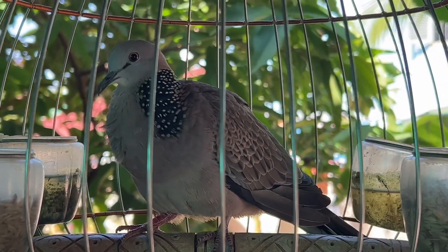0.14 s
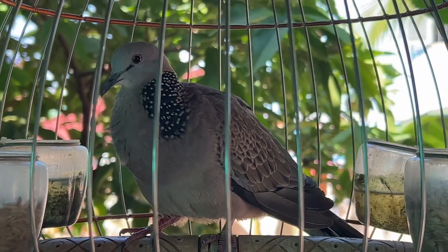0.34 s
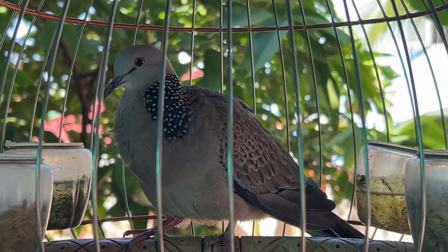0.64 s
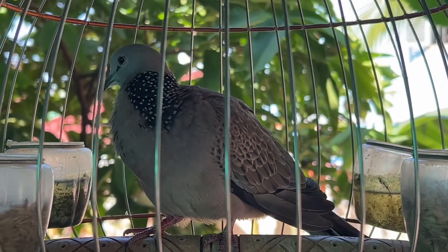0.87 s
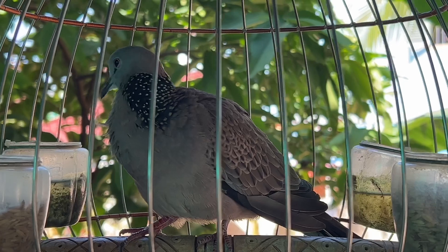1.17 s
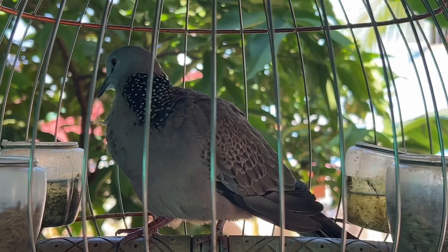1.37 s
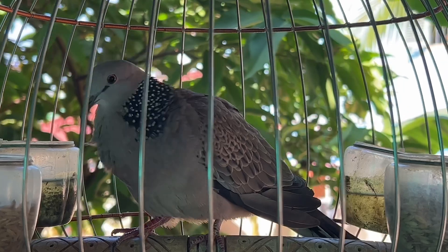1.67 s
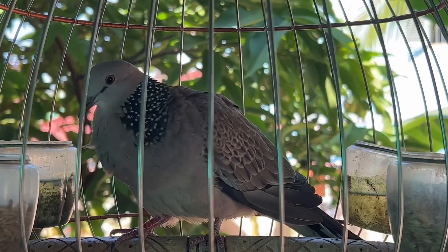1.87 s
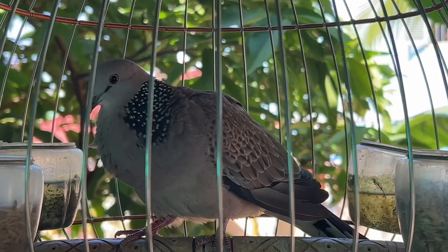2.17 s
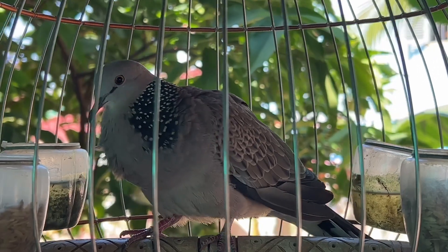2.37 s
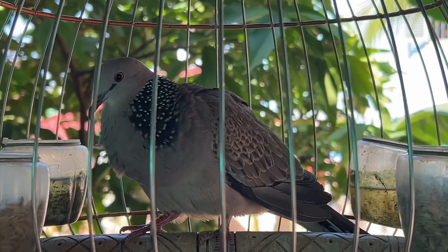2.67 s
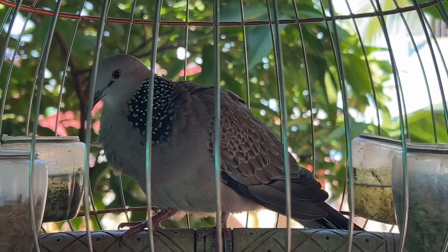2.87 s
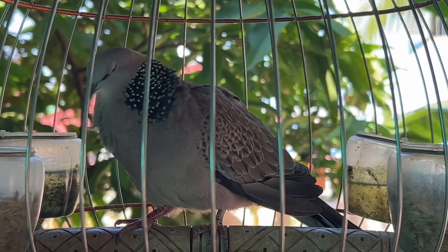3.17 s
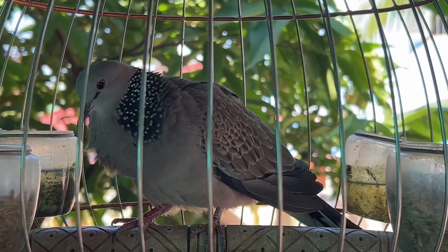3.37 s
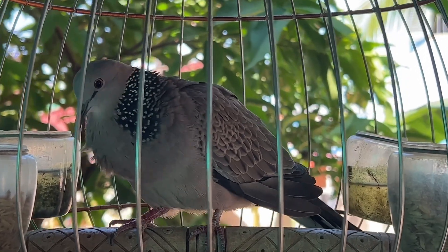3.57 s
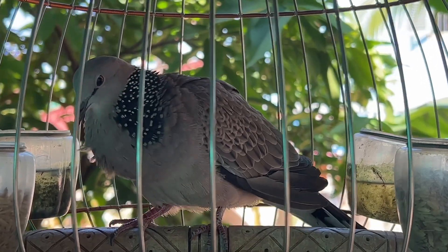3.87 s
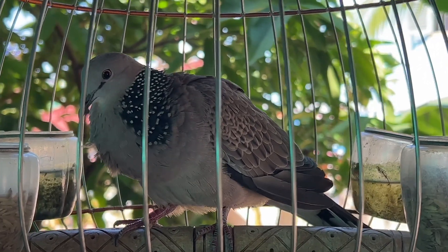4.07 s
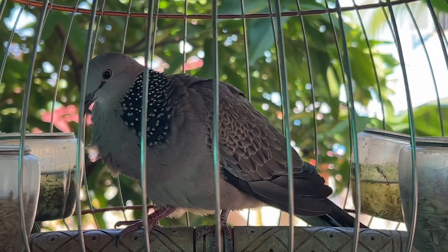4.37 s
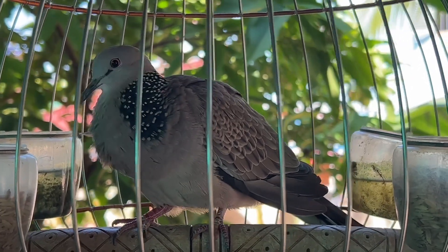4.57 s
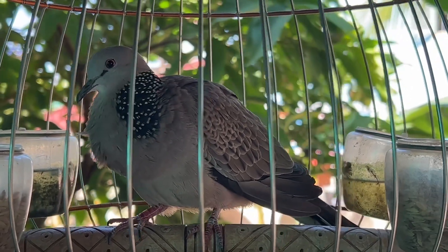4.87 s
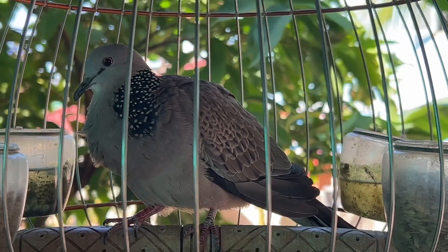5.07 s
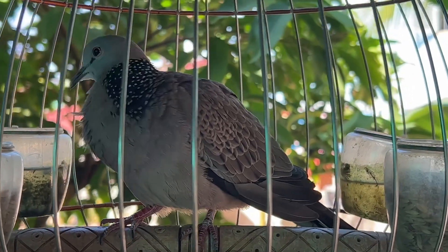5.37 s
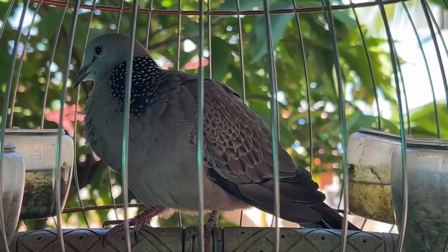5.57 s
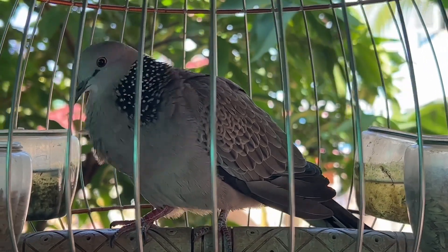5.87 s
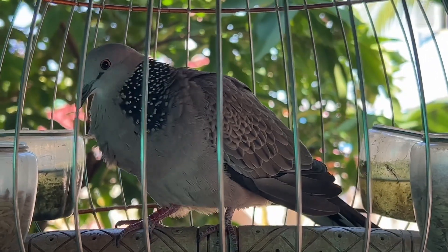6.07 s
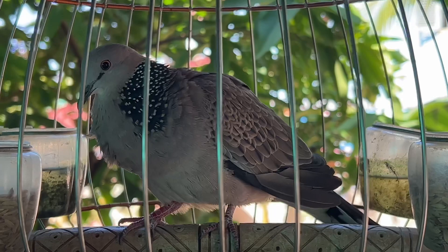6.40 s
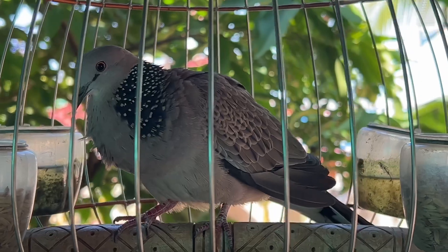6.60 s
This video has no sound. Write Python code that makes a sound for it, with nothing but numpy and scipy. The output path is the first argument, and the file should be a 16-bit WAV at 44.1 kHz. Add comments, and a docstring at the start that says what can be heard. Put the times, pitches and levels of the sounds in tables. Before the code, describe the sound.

A far, hoarse fowl calls over a low hum of traffic and softly hissing leaves. Then a dove coos close to the microphone, three times over: two short, rounded notes and a long, fluttering, falling one. Thin whistles from a small bird accompany the first phrase, and a distant motorbike fades away. Bright, ringing metal knocks and clinks start just before the last phrase and continue through it.

```python
"""A garden: a caged spotted dove, close by, gives three phrases of two soft arched coos and a long one
that trills and sinks. Its near-pure tone is shaped by the swollen crop and chopped by the throat.
Around it: traffic rumble, exhaust hum, leaf hiss, a far hoarse fowl and a small whistling bird.
Towards the end, a little way off, loose metal clatters and a steel tool clinks, both ringing in modes."""
import sys
import numpy as np
from scipy import signal
from scipy.fft import rfft, irfft
from scipy.io import wavfile
from scipy.ndimage import uniform_filter1d

SR = 44100
rng = np.random.default_rng(int(sys.argv[2]) if len(sys.argv) > 2 else 0)


def wav_record(signal):
    """Record a signal, one row per channel, as 16-bit PCM in the file named by sys.argv[1]."""
    frames = np.transpose(np.atleast_2d(signal))
    bounded = np.clip(frames, -1, 1)
    # unit amplitude maps onto the largest positive 16-bit level
    quanta = np.round(bounded * 32767).astype(np.int16)
    wavfile.write(sys.argv[1], SR, quanta)


N = 297234
TIME = np.arange(N) / SR

# open-air level curves (time [s], wash [dB], leaves [dB])
AIR_LEVELS = [(0.0, -54.5, -48), (0.43, -52, -47), (0.9, -55.5, -49.5), (1.34, -57, -54), (2.6, -55, -49),
              (2.91, -56.5, -50.5), (3.31, -61.5, -54.5), (4.56, -65.5, -60), (4.81, -63.5, -58.5),
              (5.3, -66, -59), (6.1, -60, -48.5)]
# traffic spectrum (frequency [Hz], density [dB])
RUMBLE_SPECTRUM = [(20, -44), (30, -34.5), (40, 1), (60, 1), (85, 2), (120, 0), (170, -5), (230, -13),
                   (330, -25), (700, -69.5)]
# neighbourhood wash spectrum (frequency [Hz], density [dB])
WASH_SPECTRUM = [(120, -26.5), (260, 1.5), (500, -1), (900, -3.5), (1400, -6.5), (2500, -14), (5000, -46.5)]
# leaf hiss spectrum (frequency [Hz], density [dB])
LEAF_SPECTRUM = [(900, -7), (2200, 5.5), (3500, 1.5), (6500, 1.5), (8800, -4), (10000, -10.5), (12000, -14),
                 (15500, -17.5)]
# steady motors (rotation [Hz], nearest at [s], time to -6 dB [s], harmonics 2, 3, 6 [dB])
MOTOR_PASSES = [(26.5, 0.6, 1.6, -40, -51, -46.5), (26.35, 6.88, 0.42, -60.5, -30.5, -38.5)]
# slowing motorbike (time [s], firing rate [Hz], level [dB])
BIKE_TRACK = [(.4, 26.5, -62), (1.4, 27, -41.5), (1.9, 25.5, -43), (2.5, 24.6, -44), (3.2, 24.6, -40),
              (3.5, 23.5, -44), (4.4, 23.5, -50)]
# its exhaust harmonics (multiple of firing rate, level [dB])
BIKE_HARMONICS = [(4, 0), (5, 0), (6, -7), (7, -9.5)]
# fowl, one curve a call (time [s], pitch [Hz], fundamental [dB], octave [dB], hoarseness [share of pitch])
FOWL_CALLS = [
    [(0.13, 495, -52, -60, 0.0088), (0.155, 515.5, -42, -48, .01), (0.2, 508, -64, -61, 0.0091),
     (0.305, 523.4, -62, -64, 0.017), (0.32, 535, -39, -36.5, .012), (0.37, 542, -35.5, -37, .02),
     (0.44, 552, -41.5, -48, 0.036), (0.5, 549.7, -41, -49, 0.049), (0.575, 569, -38.5, -38, 0.041),
     (0.67, 551.6, -40, -50.5, 0.035), (0.76, 506, -41.5, -45, 0.024), (0.82, 418, -51, -65, .03)],
    [(2.5, 547, -59, -54, .05), (2.63, 555, -60, -47, .05), (2.7, 586, -67, -52, .07),
     (2.78, 627, -58, -50, .07), (2.87, 602, -66, -59, 0.066), (2.95, 559, -67, -54, 0.058),
     (3.12, 537, -66, -55, .05)],
]
# arched coos, two a phrase (time [s], rise [s], fall [s], start [Hz], top [Hz], end before release [Hz],
# gain [dB], quiver delay [s], quiver depth [0-1])
ARCHED_COOS = [(1.548, 0.04, 0.061, 406, 509, 346, 1, 0.11, 0.7),
               (1.7, 0.11, 0.079, 348.5, 576.4, 516, -0.5, 0.059, 0.66),
               (3.195, 0.043, 0.071, 413, 530, 414, 1, 0.071, 0.33),
               (3.311, 0.13, 0.057, 428.4, 572, 520, -1, 0.085, 0.67),
               (5.745, 0.048, 0.06, 396, 526, 352, 2, 0.071, 0.14),
               (5.88, 0.13, 0.068, 364.3, 583, 516, 1.5, 0.062, 0.54)]
# long coos, one a phrase (time [s], length [s], top [Hz], gain [dB], first trill rate [Hz])
TRILLED_COOS = [(2.05, 0.58, 611, -0.5, 42.57), (3.676, 0.55, 619.5, -0.1, 44),
                (6.246, 0.52, 617.5, 0.4, 42.7)]
# voice level set by the swollen crop (pitch [Hz], level [dB])
CROP_RESPONSE = [(340, -45.5), (430, -33), (460, -30.5), (487, -24), (513, -19.5), (545, -16.5), (575, -13),
                 (620, -12.5)]
# air puffs at the paired coos (time [s], level [dB], length [s])
PUFF_BURSTS = [(1.635, -42, 0.078), (3.285, -51, 0.054), (3.337, -38, .03), (5.845, -43.5, 0.04),
               (5.91, -41, .04)]
# puff spectrum (frequency [Hz], density [dB])
PUFF_SPECTRUM = [(250, -26), (420, -3.5), (560, -2), (700, 9), (850, -16.5), (1400, -48)]
# small bird (time [s], length [s], mid pitch [Hz], glide [Hz], level [dB])
BIRD_WHISTLES = [(1.668, 0.11, 1712, 110.5, -40), (1.899, 0.068, 1650, 52.5, -42),
                 (2.116, 0.036, 1723, 70, -45), (2.276, 0.22, 1766, -130, -48.5)]
# soft rustles (time [s], level [dB], length [s])
RUSTLE_BURSTS = [(2.01, -46, 0.11), (2.263, -46.5, 0.16), (4.157, -52.5, 0.058), (4.631, -48.5, 0.081),
                 (6.028, -43, 0.089)]
# rustle spectrum (frequency [Hz], density [dB])
RUSTLE_SPECTRUM = [(500, -5), (1200, -4.5), (2600, 1), (4500, -1), (8000, -3.5), (10000, -13.5),
                   (15500, -21.5)]
# light metal piece (frequency [Hz], level [dB], t60 [s])
LIGHT_PIECE_MODES = [(1330, -17, .32), (2470, -5, .21), (3494, -13, .18), (3720, -10, .26), (3850, -5, .28),
                     (5510, -9, .3), (6602, -7, .22), (7300, -10, .22), (9420, -16, .18), (11000, -14, .16),
                     (11740, -11, .22), (14220, -21, .18)]
# touches on the tool (time [s], level [dB], most excited [Hz], relative tick [dB])
TOOL_TOUCHES = [(5.145, -58, 7000, -14), (5.327, -53, 7631, -1), (5.778, -32.5, 9202, -3),
                (5.783, -47, 1990, -14), (5.786, -31, 10420, -9), (5.8, -29.5, 10574, -23),
                (5.803, -33.5, 7631, -17), (6.05, -49, 5249, -17), (6.158, -35, 4198, -13),
                (6.17, -41, 4567, -12), (6.28, -45, 4567, -12), (6.166, -33, 9202, 2),
                (6.17, -41.5, 10574, -4), (6.2, -48, 5249, -8), (6.273, -38, 7000, 3),
                (6.298, -31, 7631, -5), (6.284, -41, 2363, -16), (6.31, -31, 11184, 0),
                (6.33, -38, 8682, -6), (6.688, -40, 7270, 4.5)]
# steel tool (frequency [Hz], level [dB], t60 [s])
STEEL_TOOL_MODES = [(1840, -12, .2), (1990, -7, .26), (2363, -1, .32), (3740, -11, .25), (3880, -15, .3),
                    (4120, -8, .22), (4198, -3, .38), (4567, 2, .46), (4905, -6, .36), (5249, -2, .48),
                    (6997, -3, .3), (7631, -1, .24), (8682, -8, .3), (9202, -2, .22), (10420, -7, .18),
                    (10574, 0, .28), (11184, -5, .26), (13170, -13, .25), (13700, -5, .2), (14310, -6, .2),
                    (14632, -1, .22), (14870, -3, .2)]
# crowded short modes of a touch (frequency [Hz], density [dB])
TICK_SPECTRUM = [(1500, 5), (3000, -5), (4500, 9), (6200, -2), (7200, 13), (8500, -7), (9600, -14),
                 (11100, 15.5), (12500, -11), (14600, 7), (15500, -1)]
# loose metal knocks (time [s], level [dB], tilt [dB/octave], most excited [Hz], relative crash [dB])
METAL_KNOCKS = [(5.359, -40.5, 2, 4361, -3), (5.366, -38.5, 2, 8400, -1), (5.394, -42.5, 5, 6400, 6),
                (5.408, -50, -2, 3850, 5), (5.415, -44, -3, 6923, 7.5), (5.432, -40, 3, 2470, -2),
                (5.452, -46, -6, 1865, -6), (5.503, -44, 1, 2470, -1), (5.524, -46.5, -2, 2330, -11),
                (5.556, -37.5, 5, 4290, 3), (5.564, -37.5, -3, 1865, -0.5), (5.572, -40.5, 0, 3610, -1),
                (5.615, -47.5, 3, 11740, -2), (5.652, -49.5, 6, 5510, -5), (5.887, -26, 1.5, 4290, 1.5),
                (5.892, -37, -5, 2470, -8), (5.896, -27, 4, 3799, 2.5), (5.9, -34, 6, 1865, -5),
                (5.915, -35, 4, 6602, -7), (5.947, -34, 8, 10400, 6.5)]
# heavy metal piece (frequency [Hz], level [dB], t60 [s])
HEAVY_PIECE_MODES = [(1865, -3, .26), (1925, -8, .22), (2330, -11, .18), (2590, -11, .18), (3610, -7, .2),
                     (3799, -4, .21), (4180, -8, .16), (4290, -1.5, .24), (4361, -5, .18), (4646, -13, .2),
                     (6400, -8, .18), (6923, -10, .2), (8075, -13, .26), (8400, -9, .22), (10400, -18, .16),
                     (12880, -24, .2), (15400, -25, .14)]
# crowded short modes of a knock (frequency [Hz], density [dB])
CRASH_SPECTRUM = [(700, -24), (1400, -8), (2000, -5.5), (2450, 3), (2950, -9), (3900, 4), (5200, -7),
                  (6800, 1), (8500, -5.5), (9500, -13), (11500, -31), (13000, -19), (15500, -18)]
# left microphone port behind the right (frequency [Hz], lag [cycles])
LEFT_PORT_LAG = [(8700, 0), (9100, .25), (10100, .5), (11900, 1), (12400, 1), (13300, 1.47), (14300, 1.53),
                 (15300, 2)]


def undb(db):
    """Decibels to gain."""
    return 10 ** (np.asarray(db) / 20)


def unit(x):
    """Scale to rms 1."""
    return x / np.sqrt(np.mean(x ** 2))


def curves(rows):
    """Table columns interpolated over time."""
    times_s, *columns = np.transpose(rows)
    return [np.interp(TIME, times_s, column) for column in columns]


def during(rows, fade_s):
    """1 while a table lasts, with ramps outside."""
    return np.clip(1 + np.minimum(TIME - rows[0][0], rows[-1][0] - TIME) / fade_s, 0, 1)


def ramps(age_s, attack_s, release_s):
    """Linear attack, hold and release."""
    return np.minimum(np.minimum(age_s / attack_s, (age_s[-1] - age_s) / release_s), 1)


def bursts(rows):
    """Envelope of swells, each peaking at a quarter of its length."""
    ages = [(np.maximum(TIME - at_s, 0) / length_s * 4, db) for at_s, db, length_s in rows]
    return sum(undb(db) * age * np.exp(1 - age) for age, db in ages)


def walk(rate_hz):
    """Smooth random curve, rms 1."""
    hold = max(int(SR / rate_hz), 2)
    steps = np.repeat(rng.standard_normal(N // hold + 1), hold)
    return unit(uniform_filter1d(uniform_filter1d(steps, hold), hold)[:N])


def noise(spectrum, side_db, widen_db_per_oct=0):
    """Coloured stereo noise; side_db holds at the spectral peak."""
    hz, db = np.transpose(spectrum)
    octaves = np.log2(np.arange(N // 2 + 1) * SR / N + 1)
    gain = undb(np.interp(octaves, np.log2(hz), db))
    width = undb(np.minimum(side_db + widen_db_per_oct * (octaves - np.log2(hz[np.argmax(db)])), 0))
    mid, side = (irfft(rfft(rng.standard_normal(N)) * g, N) for g in (gain, gain * width))
    return (mid + side * np.array([[1], [-1]])) / mid.std()


def add(out, at_s, sound):
    """Mix a multichannel sound in at at_s."""
    i = int(at_s * SR)
    out[:, i:i + sound.shape[1]] += sound[:, :max(N - i, 0)]


def open_air(rumble_db=-36.5, fade_db_per_s=1.26):
    """Fading traffic rumble, neighbourhood wash and leaf hiss."""
    wash_db, leaves_db = curves(AIR_LEVELS)
    rumble = noise(RUMBLE_SPECTRUM, -18.5, widen_db_per_oct=7) * undb(rumble_db - fade_db_per_s * TIME)
    wash = noise(WASH_SPECTRUM, -7.5, widen_db_per_oct=2) * undb(wash_db + 8 + walk(4.22))
    leaves = noise(LEAF_SPECTRUM, -24, widen_db_per_oct=-40) * undb(leaves_db - 1.5 + walk(12))
    return rumble + wash + leaves


def motor_hum(wobble=.0041, throb_db=2.1):
    """Motors pass behind the houses; low harmonics swell and fade with distance."""
    out = np.zeros(N)
    for hz, nearest_s, passing_s, *levels_db in MOTOR_PASSES:
        phase = phase_of(hz * (1 + wobble * walk(8.5)))
        harmonics = sum(undb(db + throb_db * walk(9)) * np.sin(k * phase)
                        for k, db in zip((2, 3, 6), levels_db))
        out += np.sqrt(2) * harmonics / (1 + ((TIME - nearest_s) / passing_s) ** 2)
    return out


def phase_of(hz):
    """Running phase [rad]."""
    return 2 * np.pi * np.cumsum(hz) / SR


def motorbike(wobble=.007, throb_db=.5):
    """Exhaust harmonics of a slowing engine; each swells and fades on its way between the houses."""
    firing_hz, db = curves(BIKE_TRACK)
    phase = phase_of(firing_hz * (1 + wobble * walk(8.2)))
    harmonics = sum(undb(line_db + throb_db * walk(1.9)) * np.sin(k * phase + rng.uniform(0, 2 * np.pi))
                    for k, line_db in BIKE_HARMONICS)
    return np.sqrt(2) * during(BIKE_TRACK, fade_s=.63) * undb(db) * harmonics


def fowl(shimmer_db=1.5):
    """Held, hoarse calls with a strong octave."""
    out = np.zeros(N)
    for call in FOWL_CALLS:
        hz, fundamental_db, octave_db, hoarseness = curves(call)
        phase = phase_of(hz * (1 + hoarseness * walk(250)))
        voice = undb(fundamental_db) * np.sin(phase) + undb(octave_db) * np.sin(2 * phase)
        out += during(call, fade_s=.015) * undb(shimmer_db * walk(90)) * voice
    return out


def porch(x, wet_db, t60_s, side_db, gap_s=.016):
    """Direct sound plus dense reflections from floor, walls and roof."""
    age_s = TIME[:SR // 2]
    mid, side = rng.standard_normal((2, len(age_s))) * undb(-60 * age_s / t60_s) * (age_s > gap_s)
    tail = (mid + undb(side_db) * side * np.array([[1], [-1]])) / np.sqrt(np.sum(mid ** 2))
    return x + undb(wet_db) * signal.fftconvolve(np.atleast_2d(x), tail, axes=1)[:, :N]


def arched_coo(at_s, rise_s, fall_s, start_hz, top_hz, end_hz, db, quiver_s, depth):
    """Control curves of a pitch arch with one quiver; the throat catches, then lets go."""
    max_climb_s, release_hz, release_s, quiver_hz = .11, 64, .015, 94.6
    age_s = TIME[:int((rise_s + fall_s) * SR)]
    left_s = rise_s + fall_s - age_s
    climbing = np.clip((rise_s - age_s) / min(rise_s, max_climb_s), 0, 1) ** 1.7
    falling = np.clip((age_s - rise_s) / fall_s, 0, 1) ** 2
    release = np.clip(1 - left_s / release_s, 0, 1)
    hz = top_hz - (top_hz - start_hz) * climbing - (top_hz - end_hz) * falling - release_hz * release
    catch = 1 - .46 * np.exp(-((left_s - .023) / .0029) ** 2)
    gain = undb(db) * catch * ramps(age_s, attack_s=.00089, release_s=.0032)
    beat_phase = 2 * np.pi * quiver_hz * (age_s - quiver_s)
    quiver = depth * np.exp(-((age_s - quiver_s) / .026) ** 2)
    return at_s, hz, gain, beat_phase, quiver


def throat_flutter(beat_phase, depth, snap=1.9):
    """The throat valve snaps open for half of each beat: opening (rms 1) and pressure swing."""
    beat = np.sin(beat_phase / 2) ** 2
    gate = np.tanh(snap * beat ** 1.884) / np.tanh(snap)
    opening = (1 - depth + depth * gate) / np.hypot(1 - depth + depth * gate.mean(), depth * gate.std())
    return opening, depth * (beat - .8)


def dove(bend_hz=65, slip_hz=125, husky_below_hz=480, octave_db=-53, rasp_db=-19, air_db=-39):
    """Near-pure tone, beak shut, louder near the crop's resonance; each beat bends pitch and rasps."""
    layers = np.zeros((4, N))
    chance = np.array([np.tanh(2 * walk(110) + 1.3), walk(150), walk(130), walk(900)])
    coos = [arched_coo(*row) for row in ARCHED_COOS] + [trilled_coo(*row) for row in TRILLED_COOS]
    for at_s, hz, gain, beat_phase, depth in coos:
        span = int(at_s * SR) + np.arange(len(hz))
        slips, waver, shimmer, grit = np.take(chance, span, axis=1, mode="wrap")
        opening, swing = throat_flutter(beat_phase, depth)
        slip = np.maximum(1 - opening, 0) * slips  # mostly upward, throat nearly closed
        husky = np.clip((husky_below_hz - hz) / 70, 0, 1)  # low, weakly blown notes are unsteady
        jitter, shimmer_db = .004 + .03 * husky, .3 + 2.5 * husky
        phase = phase_of(hz * (1 + jitter * waver) + bend_hz * swing + slip_hz * slip)
        level = undb(np.interp(hz, *np.transpose(CROP_RESPONSE)) + shimmer_db * shimmer)
        gate = np.sqrt(2) * gain * opening
        tone = gate * level * np.sin(phase)
        octave = gate * undb(octave_db) * (level + 1) * np.sin(2 * phase)
        rasp = undb(rasp_db) * 2 * np.abs(swing) * grit * tone
        add(layers, at_s, np.array([tone, octave, rasp, gate * np.sqrt(level)]))
    tone, octave, rasp, flow = layers
    # the crop passes a band just above the fundamental; airflow stirs its resonance
    crop_band = signal.butter(4, [560, 1040], "bandpass", fs=SR, output="sos")
    air_band = signal.butter(3, [560, 670], "bandpass", fs=SR, output="sos")
    air = unit(signal.sosfilt(air_band, rng.standard_normal(N)))
    return tone + signal.sosfilt(crop_band, octave + rasp) + undb(air_db) * flow * air


def echoes(x, roof_s=.0115, roof_db=-21, wall_s=.068, wall_db=-28):
    """A roof reflection fills the trill's gaps; a fainter one returns from a wall."""
    return x + sum(undb(db) * np.interp(TIME - lag_s, TIME, x, left=0)
                   for lag_s, db in [(roof_s, roof_db), (wall_s, wall_db)])


def afterring(x, hz=570, t60_s=.2, db=-24):
    """A resonance of the space around the cage rings on after each coo."""
    resonator = signal.iirpeak(hz, np.pi * hz * t60_s / np.log(1000), fs=SR)
    return x + undb(db) * signal.lfilter(*resonator, x)


def air_puffs():
    """Soft puffs of air between the paired coos."""
    return noise(PUFF_SPECTRUM, side_db=-17.5) * bursts(PUFF_BURSTS)


def small_bird(arch_hz=39, waver=.012, shimmer_db=2):
    """Thin gliding whistles, each bowed upward."""
    out = np.zeros(N)
    for at_s, length_s, mid_hz, glide_hz, db in BIRD_WHISTLES:
        along = np.clip((TIME - at_s) / length_s, 0, 1) - .5
        hz = mid_hz + glide_hz * along - arch_hz * (2 * along) ** 2
        envelope = np.sqrt(np.abs(np.cos(np.pi * along))) * undb(db + shimmer_db * walk(70))
        out += envelope * np.sin(phase_of(hz * (1 + waver * walk(150))))
    return out


def throat_closing(lead_s=.016, length_s=.03, start_hz=686, fall_hz=70, arched_db=-30.5, trilled_db=-37.5):
    """The throat shuts after a phrase's second and third coo: a brief, rough, higher flick."""
    out = np.zeros(N)
    ends = [(at_s + rise_s + fall_s, arched_db) for at_s, rise_s, fall_s, *_ in ARCHED_COOS[1::2]]
    ends += [(at_s + coo_s, trilled_db) for at_s, coo_s, *_ in TRILLED_COOS]
    rough = 1 + .07 * walk(400)
    for end_s, db in ends:
        along = np.clip((TIME - end_s + lead_s) / length_s, 0, 1)
        out += undb(db) * np.sin(np.pi * along) * np.sin(phase_of((start_hz - fall_hz * along) * rough))
    return out


def rustles(flicker_db=2):
    """Brief, soft swells of flickering noise."""
    return noise(RUSTLE_SPECTRUM, side_db=-28) * undb(flicker_db * walk(300)) * bursts(RUSTLE_BURSTS)


def trilled_coo(at_s, length_s, top_hz, db, trill_hz):
    """Control curves of a rise, trilled hold and sinking tail; the trill quickens and dies away."""
    start_hz, rise_s, hold_until_s = 479, .0473, .2
    sink_to_hz, sink_s, drop_hz, drop_s = 441.7, .38, 57, .063
    first_beat_s, rate_doubling_s, trill_until_s, trill_fade_s = .0305, .375, .21, .066
    age_s = TIME[:int(length_s * SR)]
    rising = np.maximum(1 - age_s / rise_s, 0)
    sinking = np.clip((age_s - hold_until_s) / sink_s, 0, 2) ** .64
    dropping = np.clip(1 + (age_s - length_s) / drop_s, 0, 1)
    hz = top_hz - (top_hz - start_hz) * rising - (top_hz - sink_to_hz) * sinking - drop_hz * dropping
    uneven = 1 + .03 * walk(70)[:len(age_s)]
    beat_phase = phase_of(trill_hz * uneven * (1 + ((age_s - first_beat_s) / rate_doubling_s) ** 2))
    beat_phase += np.pi - np.interp(first_beat_s, age_s, beat_phase)  # crest at first_beat_s
    onset = np.minimum(age_s / (.7 * first_beat_s), 1) ** 3
    depth = .85 * onset * np.exp(-np.maximum(age_s - trill_until_s, 0) / trill_fade_s)
    first_beat_db = -2 * np.exp(-((age_s - first_beat_s) / .011) ** 2)
    gain = undb(db + first_beat_db) * ramps(age_s, attack_s=.001, release_s=.01)
    return at_s, hz, gain, beat_phase, depth


def ring(modes, gains, detune):
    """Decaying, randomly detuned modes, initial rms 1."""
    hz, _, t60_s = np.transpose(modes)[:, :, None]
    hz = hz * (1 + detune * rng.standard_normal(hz.shape))
    age_s = TIME[:SR * 2 // 5]
    decay = gains[:, None] / np.linalg.norm(gains) * undb(-60 * age_s / t60_s)
    return np.sqrt(2) * (decay * np.sin(2 * np.pi * hz * age_s + rng.uniform(0, 2 * np.pi, hz.shape))).sum(0)


def graze(sound, rise_s):
    """Pieces graze and chatter before meeting fully, so the sound builds over a few ms."""
    return sound * (1 - np.exp(-TIME[:sound.shape[1]] / rise_s))


def ping(at_s=4.986, db=-46.5, tilt_db_per_oct=-2.5, t60_ratio=1.6):
    """The light piece, struck alone; hanging free, it rings longer."""
    out = np.zeros((2, N))
    hz, mode_db, t60_s = np.transpose(LIGHT_PIECE_MODES)
    gains = undb(mode_db + tilt_db_per_oct * np.log2(hz))
    body = ring(np.transpose([hz, mode_db, t60_ratio * t60_s]), gains, detune=.001)
    add(out, at_s, undb(db) * graze(np.array([body, body]), rise_s=.003))
    return out


def bounces(hits, gap_s, loss_db, count):
    """Each hit and its weaker rebounds at uneven gaps."""
    for at_s, db, *colour in hits:
        for k, wait_s in enumerate(gap_s * rng.uniform(.5, 1.5, count)):
            yield at_s, db - k * loss_db, *colour
            at_s += wait_s


def contact(source, t60_s, samples):
    """Many short, crowded modes as a decaying slice of coloured noise."""
    i = rng.integers(0, N - samples)
    return source[:, i:i + samples] * undb(-60 * TIME[:samples] / t60_s)


def tool_clinks(focus_db=24, scatter_db=.5):
    """A steel tool rings high; where and how roughly it is touched colours each clink."""
    out = np.zeros((2, N))
    tick_noise = noise(TICK_SPECTRUM, side_db=-24)
    hz, mode_db, _ = np.transpose(STEEL_TOOL_MODES)
    for at_s, db, main_hz, tick_db in bounces(TOOL_TOUCHES, gap_s=.016, loss_db=5.5, count=2):
        falloff_db = focus_db * np.abs(np.log2(hz / main_hz)) ** .27
        gains = undb(mode_db - falloff_db - scatter_db * rng.standard_normal(len(hz)))
        body = ring(STEEL_TOOL_MODES, gains, detune=.0018)
        tick = undb(tick_db) * contact(tick_noise, t60_s=.1, samples=len(body))
        add(out, at_s, undb(db) * graze(body + tick, rise_s=.003))
    return out


def clatter(scatter_db=3, focus_db=10, focus_oct=.025):
    """Loose pieces knock together; each knock brings out one mode over a short crash."""
    out = np.zeros((2, N))
    crash_noise = noise(CRASH_SPECTRUM, side_db=-13)
    modes = LIGHT_PIECE_MODES + HEAVY_PIECE_MODES
    hz, mode_db, _ = np.transpose(modes)
    knocks = bounces(METAL_KNOCKS, gap_s=.011, loss_db=7, count=3)
    for at_s, db, tilt_db_per_oct, main_hz, crash_db in knocks:
        boost_db = focus_db * np.exp(-(np.log2(hz / main_hz) / focus_oct) ** 2)
        tilt_db = tilt_db_per_oct * np.log2(hz)
        gains = undb(mode_db + boost_db + tilt_db + scatter_db * rng.standard_normal(len(hz)))
        body = ring(modes, gains, detune=.007)  # resting on each other shifts the modes
        crash = undb(crash_db) * contact(crash_noise, t60_s=.11, samples=len(body))
        add(out, at_s, undb(db) * graze(body + crash, rise_s=.004))
    return out


def scene():
    """Near dove, metal further off, far birds, street and garden."""
    street = motor_hum() + motorbike()
    puffs = air_puffs()
    voice = afterring(echoes(dove() + throat_closing()))
    near = porch(voice + puffs, wet_db=-19, t60_s=.3, side_db=0)
    metal = porch(ping() + clatter() + tool_clinks(), wet_db=-7, t60_s=.33, side_db=-5)
    far = porch(fowl() + small_bird(), wet_db=-6.5, t60_s=.55, side_db=2)
    return near + metal + far + street + open_air() + rustles()


def record(dry, cutoff_hz=15750):
    """A phone's two ports fall out of step in the high treble; a low-pass cuts the top."""
    lag_rad = 2 * np.pi * np.interp(np.arange(N // 2 + 1) * SR / N, *np.transpose(LEFT_PORT_LAG))
    left = irfft(rfft(dry[0]) * np.exp(-1j * lag_rad), N)
    lowpass = signal.ellip(8, .2, 70, cutoff_hz, fs=SR, output="sos")
    return signal.sosfilt(lowpass, np.array([left, dry[1]]))


dry = scene()
out = record(dry)
wav_record(out)
```